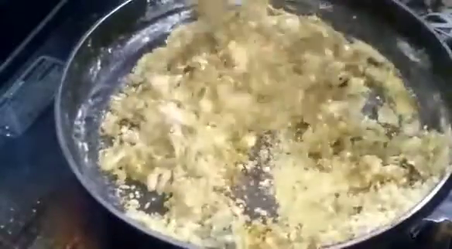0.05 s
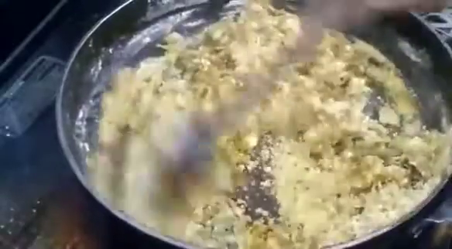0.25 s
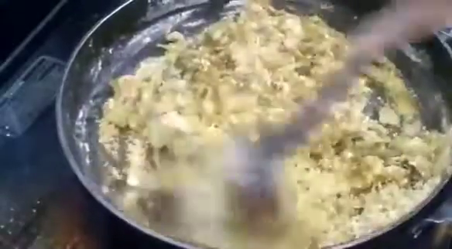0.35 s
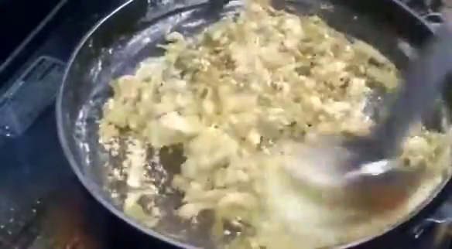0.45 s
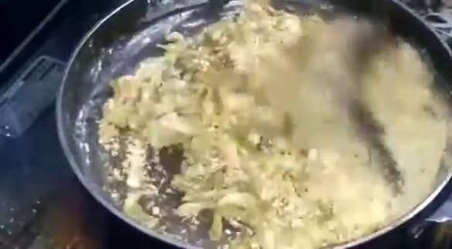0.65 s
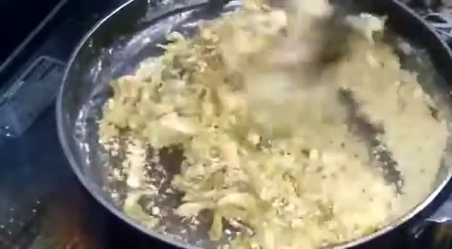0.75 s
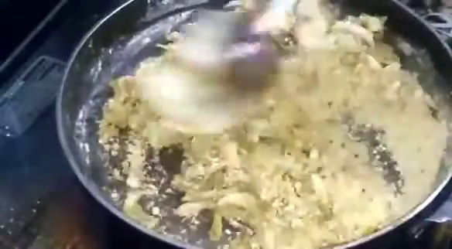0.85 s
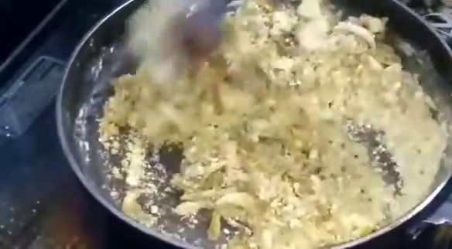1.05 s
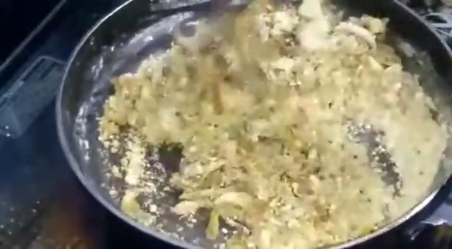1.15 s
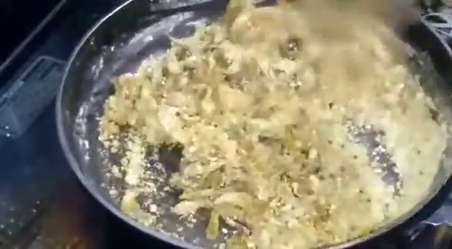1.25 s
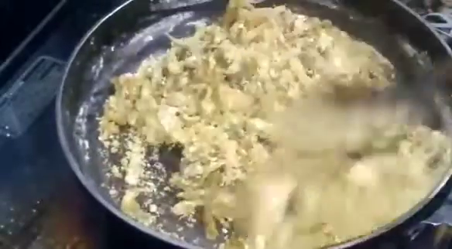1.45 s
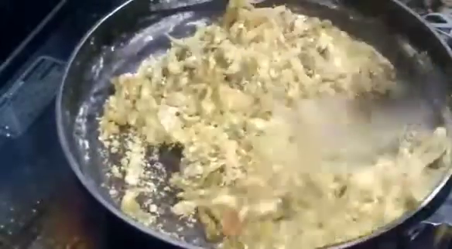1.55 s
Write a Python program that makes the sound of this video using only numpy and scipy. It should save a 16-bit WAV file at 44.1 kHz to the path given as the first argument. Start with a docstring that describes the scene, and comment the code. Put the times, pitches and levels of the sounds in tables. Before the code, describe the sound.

A metal spatula stirs dry flour in a frying pan, close up. After a faint slide, it knocks at 0.25 seconds with a brief, damped ring. A rasping scrape from 0.4 to 0.6 seconds ends in a short groan. Clumps drop softly near 0.9. A second knock at 1.0 leads into short scrapes, and crumbs fall from 1.4. The small kitchen echoes slightly over a faint low hum.

```python
"""A metal spatula stirs dry flour in a frying pan, close up in a small kitchen. The blade slides in with
a faint hiss and knocks on the pan, which rings briefly under its load. It pushes through the flour,
tiny slips shaking pan and blade, until the pan groans in the hardest push. Clumps drop back softly.
A second knock leads into a few short pushes, and the last crumbs fall. Throughout, the room answers
over a low steady hum."""
import sys
import numpy as np
from scipy import signal
from scipy.fft import rfft, irfft
from scipy.io import wavfile
from scipy.ndimage import uniform_filter1d

SR = 44100
rng = np.random.default_rng(int(sys.argv[2]) if len(sys.argv) > 2 else 0)


def output_pcm(signal):
    """Save a mono or channel-first signal as 16-bit PCM at the path in sys.argv[1].

    Samples are clipped to [-1, 1] before scaling.
    """
    pcm = np.clip(np.atleast_2d(signal).T, -1, 1) * 32767
    wavfile.write(sys.argv[1], SR, np.round(pcm).astype(np.int16))


N = 70560
TIME = np.arange(N) / SR
CONTACT_S = 0.00047  # attack of a knock's noise

# spatula knocks: t/s, pan ring/dB, lowest mode/dB, second mode/dB, clatter/dB, blade/dB,
# rebound delay/s, rebound/dB
KNOCK_HITS = [(0.239, -25.5, -4.5, 1.5, -22.5, -30.5, .0045, 4),
              (1.0298, -37.5, 8, -5, -30, -34.5, .010, -4.5)]
# modes of the flour-loaded pan: f/Hz, level/dB, t60/s
PAN_MODES = [(433.5, -4, 0.11), (658, 3.5, 0.036), (502, -9.5, 0.067), (613, -23, 0.073), (736, -5, 0.11),
             (823, -9.5, 0.034), (1068, -1.5, 0.05), (1214, -10, 0.14), (1520, -19, 0.022),
             (1500, -2, 0.025), (1630, -13, 0.21), (1765, 0, 0.042), (1830, -7.5, 0.057), (2080, -9, 0.096),
             (2540, -2.5, 0.023), (3040, -28, 0.056), (3590, -8, 0.036)]
# modes of the steel blade: f/Hz, level/dB, t60/s
STEEL_MODES = [(2782, -8.5, 0.1), (3510, -5, 0.017), (4000, -21, .05), (4166, -9, 0.074), (4800, -7, 0.032),
               (4950, -16, 0.049), (5870, -5, 0.063), (6450, -3.5, 0.059), (7030, -16, 0.036),
               (7850, 1.5, 0.046), (7680, 3, 0.062), (8210, -3.5, 0.094), (8530, 4, 0.025),
               (9340, -2.5, 0.067), (8900, -1, 0.052), (10100, -25, 0.029), (10160, -13, 0.044),
               (15200, -7, 0.025)]
# hiss of the blade, brightest near 8 kHz: f/Hz, level/dB
BLADE_HISS = [(1000, -31), (4000, -21), (5500, -24), (6900, -8), (7600, -1.5), (8600, -5.5), (9500, -10),
              (11000, -16.5), (13500, -14.5), (15500, -10.5)]


def scrapes():
    """Slips shake pan and blade; as the edge bites through the flour, ring and hiss trade places."""
    # pushes: t/s, length/s, rise/s, pan ring/dB, lowest mode/dB, second mode/dB, rasp/dB, blade/dB,
    # grit/dB, shift away from ring towards hiss/dB, echo delay in the pan/s, echo share/0-1
    strokes = [(0.015, 0.02, .012, -76, 9.5, -1.5, -76, -71.5, -93, 3, .00093, 0.2),
               (0.08, 0.27, 0.018, -87, 18, 16, -80, -73, -76, 18, .00093, 0.02),
               (0.403, 0.072, 0.011, -61.5, 13.5, -8, -53, -55.5, -77, -6, .00077, 0.2),
               (0.504, 0.11, 0.03, -45.5, 1.5, 0.5, -40.5, -44, -47.5, 8.5, .00075, 0),
               (1.045, 0.078, 0.048, -46.5, 2, -6, -42, -46.5, -60, -0.5, .00093, 0.3),
               (1.167, 0.067, 0.015, -58, 9.5, -12, -56.5, -54, -58, -1.5, .00093, 0),
               (1.237, 0.013, 0.0035, -42, 4.5, -11, -41, -41, -62, -4, .00093, 0.49),
               (1.285, 0.073, 0.015, -62, -5, -5, -64.5, -63, -63, -10, .00093, 0),
               (0.86, 0.097, 0.02, -65, -2, -12, -81, -100, -75, 4.5, .00093, 0.4)]
    # midrange rasp of the scrape: f/Hz, level/dB
    rasp_spectrum = [(100, -16), (300, -18), (450, 2.5), (850, 2), (1500, 4.5), (2200, -2.5), (3000, -7),
                     (4500, -23), (8000, -21), (16000, -34)]
    # bright grit of the scrape: f/Hz, level/dB
    grit_spectrum = [(500, -55), (1800, 8), (2800, 2), (3900, 2), (4500, -2.5), (6300, -7), (7500, 2),
                     (10000, -10), (13000, -12), (15500, -14)]
    release_s, judder_hz, judder_db, blade_modes_db = 0.014, 123.6, 0.56, -3
    rasp_follow, blade_follow, grit_follow = 0.45, 0.51, 2.93  # how far each layer follows the shift
    out, forces = np.zeros(N), np.zeros((4, N))
    layer_slips = np.array([slips() for _ in forces])
    pan_slips = slips()
    wobble = np.interp(TIME * judder_hz, np.arange(N), rng.standard_normal(N))
    judder = unit(amp(judder_db * wobble))
    for (start, length, rise, ring_db, lowest_db, second_db,
         rasp_db, blade_db, grit_db, shift_db, echo_s, echo_share) in strokes:
        t = TIME - start
        pressure = judder * np.clip(t / rise, 0, 1) * np.exp(-np.maximum(t - length, 0) / release_s)
        shift = shift_db * (np.clip(t / length, 0, 1) - .5)
        pan = pan_ring(lowest_db, second_db) / np.linalg.norm(ring(PAN_MODES))
        out += signal.fftconvolve(pan_slips * pressure * amp(ring_db - shift), pan)[:N]
        rasp = pressure * amp(rasp_db + rasp_follow * shift)
        blade = pressure * amp(blade_db + blade_follow * shift)
        grit = pressure * amp(grit_db + grit_follow * shift)
        forces += pan_echo(layer_slips * [rasp, blade, grit, amp(blade_modes_db) * blade],
                           echo_s, echo_share)
    tap = signal.unit_impulse(SR // 10)
    bodies = [colour(tap, spectrum) for spectrum in (rasp_spectrum, BLADE_HISS, grit_spectrum)]
    bodies.append(ring(STEEL_MODES))
    return out + sum(shake(force, body) for force, body in zip(forces, bodies))


def slips(per_s=4100, spread_db=2.5):
    """Dense, tiny stick-slip clicks of uneven size."""
    size = amp(spread_db * np.minimum(rng.exponential(1, N), 4))
    return unit(size * rng.choice([-1., 1.], N) * (rng.random(N) < per_s / SR))


def knocks(clatter_t60_s=0.049, blade_t60_s=0.068, blade_modes_db=-8):
    """The blade lands and rebounds: pan modes, a dense clatter and the blade's own zing."""
    # clatter of steel on the pan: f/Hz, level/dB
    clatter_spectrum = [(100, -18), (250, -14.5), (420, 4), (700, -1), (900, -11.5), (1750, 1), (2600, -8),
                        (4300, -18.5), (8000, -21.5), (16000, -33)]
    out, clatter, zing = np.zeros(N), noise(clatter_spectrum), noise(BLADE_HISS)
    for start, ring_db, lowest_db, second_db, clatter_db, blade_db, rebound_s, rebound_db in KNOCK_HITS:
        for at, db in [(start, 0), (start + rebound_s, rebound_db)]:
            add(out, at, amp(db + ring_db) * pan_ring(lowest_db, second_db))
            out += amp(db + clatter_db) * clatter * burst(at, CONTACT_S, clatter_t60_s)
        out += amp(blade_db) * zing * burst(start, CONTACT_S, blade_t60_s)
        add(out, start, amp(blade_db + blade_modes_db) * ring(STEEL_MODES))
    return out


def knock_sparkle(gain_db=-7.5, t60_s=0.052):
    """A splash of treble that briefly widens each knock."""
    # top end of a knock: f/Hz, level/dB
    spectrum = [(3500, -55), (4600, -22), (5500, -10), (8000, 8), (12000, -3), (15500, -2)]
    envelope = sum(amp(blade_db + gain_db) * burst(start, CONTACT_S, t60_s)
                   for start, *_, blade_db, _, _ in KNOCK_HITS)
    return noise(spectrum) * envelope


def pan_ring(lowest_db, second_db):
    """The place of contact sets how strongly the pan's first two listed modes answer."""
    return ring(PAN_MODES, np.pad([lowest_db, second_db], (0, len(PAN_MODES) - 2)))


def pan_echo(x, delay_s, share):
    """Sound bounces between blade and pan: a hollow comb of resonances."""
    delay = np.exp(-2j * np.pi * np.fft.rfftfreq(N, 1 / SR) * delay_s)
    return irfft(rfft(x) * np.sqrt(1 - share ** 2) / (1 + share * delay), N)


def groan(width_hz=160, roughness=.55):
    """The pan groans in the hardest push: a short, rough stick-slip tone that sinks."""
    # the groan's glide: t/s, length/s, first f/Hz, last f/Hz, level/dB
    glide = (0.522, .074, 740, 640, -37)
    start, length, first_hz, last_hz, db = glide
    progress = np.clip((TIME - start) / length, 0, 1)
    pole = np.exp(-np.pi * width_hz / SR)
    jitter = unit(signal.lfilter([1 - pole], [1, -pole], rng.standard_normal((2, N))))
    tone = np.exp(2j * np.pi * np.cumsum(first_hz + (last_hz - first_hz) * progress) / SR)
    rough_tone = (tone * (1 + roughness * (jitter[0] + 1j * jitter[1]))).real
    return amp(db) * np.sin(np.pi * progress) * unit(rough_tone)


def clumps(rise_s=0.0038, t60_s=0.055):
    """Falling flour lands in the pan with soft, dull thuds."""
    # landings: t/s, level/dB
    landings = [(0.866, -47.5), (0.897, -54), (0.946, -52), (0.972, -70), (1.369, -52.5), (1.456, -61),
                (1.505, -57), (1.555, -58)]
    # thud of a clump: f/Hz, level/dB
    thud = [(60, -25), (180, -3), (300, 1), (450, 5), (700, -0.5), (1100, -11.5), (2000, -10.5),
            (6000, -32)]
    return noise(thud) * sum(amp(db) * burst(start, rise_s, t60_s) for start, db in landings)


def kitchen(x, predelay_s=0.0057):
    """Dense reflections, each band dying at its own speed."""
    # decay of the room: f/Hz, t60/s
    room_decay = [(250, 0.75), (660, 0.3938), (1800, 0.4), (4500, 0.56), (8000, 0.2631), (15000, 0.46)]
    # tone of the reverb: f/Hz, level/dB
    room_tone = [(150, -5.5), (450, -8.5), (900, -2.5), (1800, -4.5), (4000, -9.5), (8000, -2.5),
                 (15000, -7)]
    hz, t, bands = signal.stft(rng.standard_normal(SR // 2), SR, nperseg=256)
    decay = 1e-3 ** (t / read(room_decay, hz)[:, None])
    tail = signal.istft(bands * decay, SR, nperseg=256)[1]
    fade_in = np.clip(TIME[:len(tail)] / predelay_s - 1, 0, 1)
    return colour(shake(x, tail * fade_in), room_tone)


def hum(level_db=-59, patchy_db=2.5):
    """Low kitchen hum with a thin hiss, slightly patchy in time and pitch."""
    # hum and hiss: f/Hz, level/dB
    spectrum = [(20, 4.5), (42, -26.5), (70, 5.5), (115, -7.5), (190, -2.5), (340, -15.5), (430, -2),
                (560, -13.5), (1100, -12.5), (2200, -24), (4500, -33), (6500, -33.5), (8200, -18),
                (10500, -35), (15500, -29.5)]
    bands = signal.stft(noise(spectrum), nperseg=512)[2]
    patches = uniform_filter1d(rng.standard_normal(bands.shape), size=8, axis=0)
    patches = unit(uniform_filter1d(patches, size=10, axis=1))
    bed = signal.istft(bands * amp(patchy_db * patches), nperseg=512)[1][:N]
    return amp(level_db) * unit(bed)


def ring(modes, gains_db=0):
    """Decaying modes after one tap, alternating in polarity."""
    hz, db, t60 = np.transpose(modes)[:, :, None]
    t = TIME[:SR // 4]
    waves = amp(db + np.reshape(gains_db, (-1, 1))) * 1e-3 ** (t / t60) * np.sin(2 * np.pi * hz * t)
    return (-1.) ** np.arange(len(modes)) @ waves


def shake(force, body):
    """Drives a ringing body whose response is scaled to unit energy."""
    return signal.fftconvolve(force, body / np.linalg.norm(body))[:N]


def burst(start, rise, t60):
    """Quick attack, exponential decay."""
    t = np.maximum(TIME - start, 0)
    return np.minimum(t / rise, 1) * 1e-3 ** (t / t60)


def noise(spectrum):
    """Coloured noise of rms 1."""
    return unit(colour(rng.standard_normal(N), spectrum))


def colour(x, spectrum):
    """Minimum-phase EQ with the given curve."""
    log_gain = np.log(amp(read(spectrum, abs(np.fft.fftfreq(4096, 1 / SR)))))
    taps = np.fft.ifft(np.exp(np.conj(signal.hilbert(log_gain)))).real
    return signal.fftconvolve(x, taps[:len(taps) // 2])[:len(x)]


def read(points, hz):
    """Reads a curve on a log-frequency axis."""
    f, value = np.transpose(points)
    return np.interp(np.log(hz + 1), np.log(f + 1), value)


def add(mix, start, sound):
    """Mixes a sound in at start seconds."""
    part = mix[round(start * SR):][:len(sound)]
    part += sound[:len(part)]


def amp(db):
    """Decibels to gain."""
    return 10 ** (np.asarray(db) / 20)


def unit(x):
    """Scales to rms 1."""
    return x / np.sqrt(np.mean(x ** 2) + 1e-20)


def scene():
    """Everything sits in the centre; only the treble spreads a little."""
    # the pan sounds with little bass: f/Hz, level/dB
    low_cut = [(20, -6), (70, -17), (150, -8.5), (260, -3.5), (380, -1), (16000, 0.5)]
    # stereo width of the reverb: f/Hz, side level/dB
    width = [(2500, -82), (4000, -36), (5000, -4), (7000, -42), (9500, -36), (11500, -0.5), (15000, -12)]
    pan = colour(knocks() + scrapes() + groan(), low_cut) + clumps()
    mid = pan + kitchen(pan) + hum()
    side = colour(kitchen(pan), width) + knock_sparkle()
    return np.array([mid + side, mid - side])


def record(dry, cutoff_hz=15850):
    """The recorder's band limit: a steep low-pass."""
    lowpass = signal.firwin(511, cutoff_hz, window=("kaiser", 8), fs=SR)
    return signal.oaconvolve(dry, lowpass[None], "same")


dry = scene()
out = record(dry)
output_pcm(out)
```